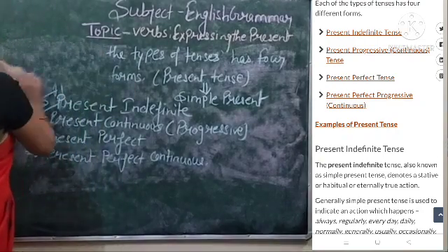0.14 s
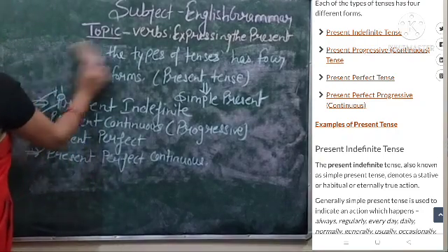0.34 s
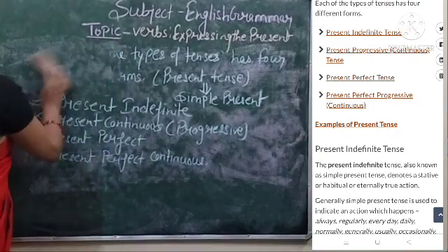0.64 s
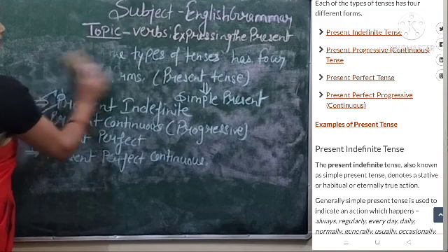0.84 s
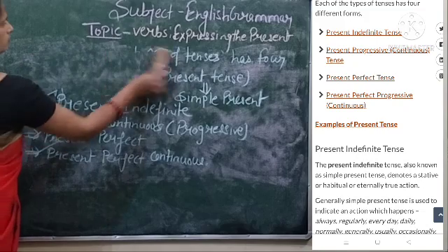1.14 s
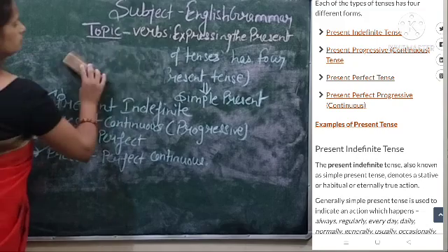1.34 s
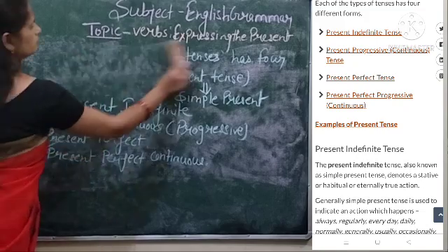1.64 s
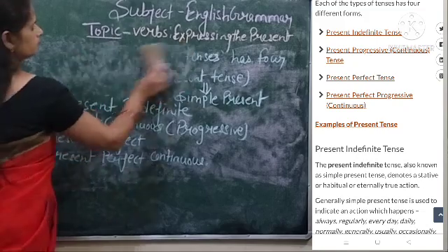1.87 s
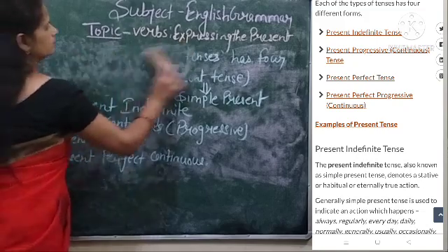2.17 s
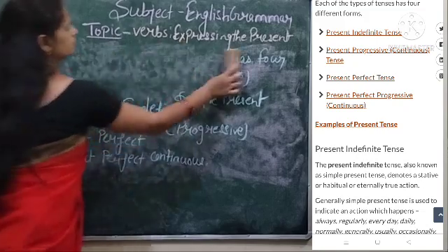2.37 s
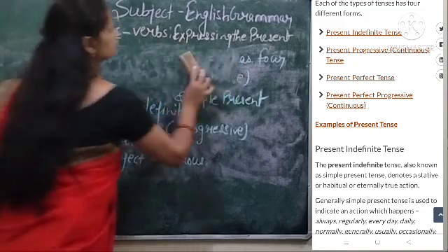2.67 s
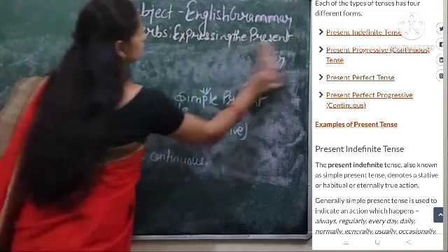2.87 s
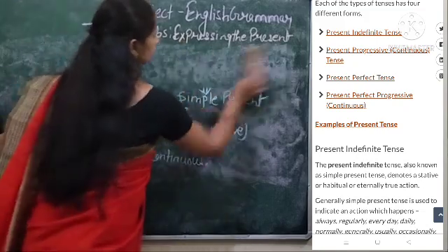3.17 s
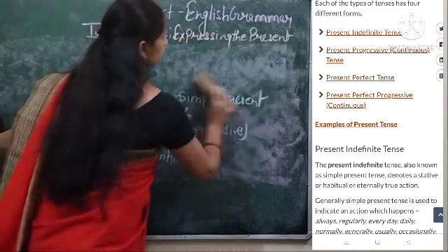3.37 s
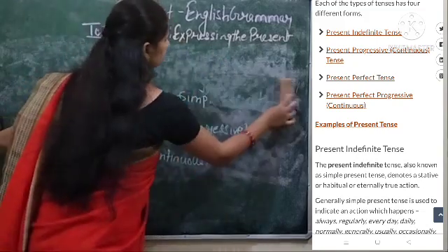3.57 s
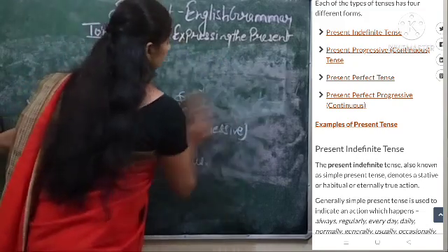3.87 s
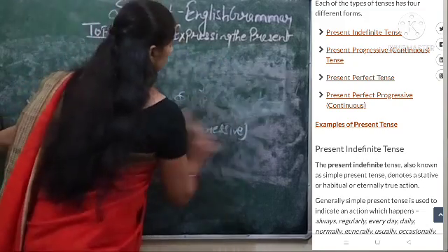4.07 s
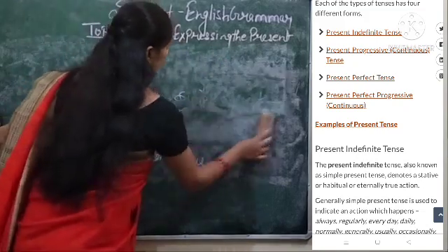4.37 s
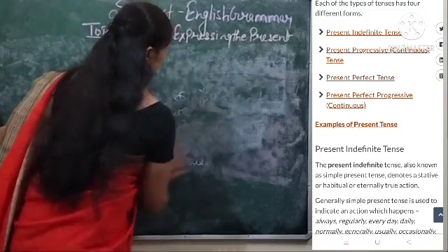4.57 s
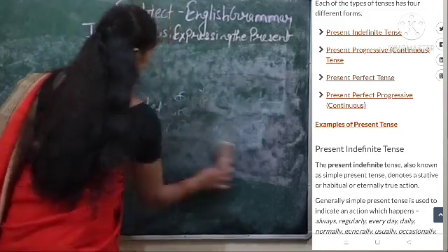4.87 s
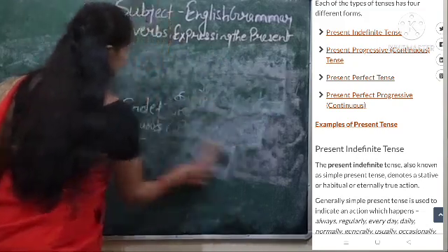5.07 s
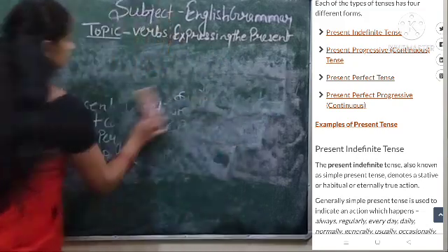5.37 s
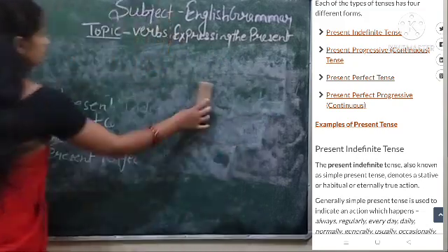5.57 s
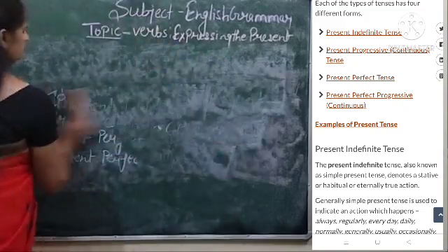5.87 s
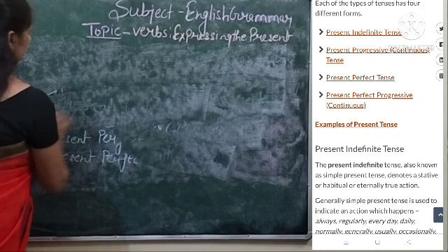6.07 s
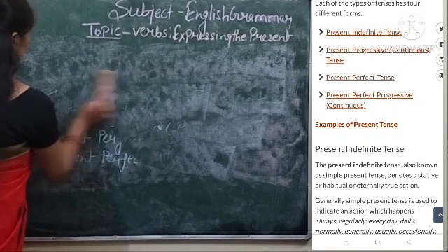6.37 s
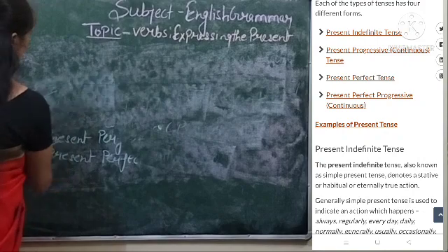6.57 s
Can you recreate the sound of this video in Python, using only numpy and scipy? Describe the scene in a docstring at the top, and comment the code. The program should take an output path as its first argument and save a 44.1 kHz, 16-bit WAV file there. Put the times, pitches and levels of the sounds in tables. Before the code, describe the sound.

A duster wipes a blackboard in hissing strokes over a rushing fan that buffets the microphone, with two bangle clinks and a distant bird whistle.

```python
"""From the start a felt duster sweeps to and fro over a chalky blackboard, hissing by friction, while a fan
rushes and its draught buffets one small microphone in low lumps. At 0.3 s glass bangles collide and ring.
From 1.6 s a far bird whistles once through the classroom. Near 5 s the bangles clink again,
and duster and fan go on to the end."""
import sys
import numpy as np
from scipy import signal
from scipy.fft import rfft, irfft, next_fast_len
from scipy.io import wavfile
from scipy.ndimage import map_coordinates

SR = 44100
rng = np.random.default_rng(int(sys.argv[2]) if len(sys.argv) > 2 else 0)


def int16_out(signal):
    """Quantize to a 16-bit WAV file."""
    q = np.round(np.clip(np.atleast_2d(signal).T, -1, 1) * 32767)
    wavfile.write(sys.argv[1], SR, q.astype(np.int16))


N = 296793

# The fan's rush. Each row: frequency in Hz, relative spectral density in dB.
FAN_SPECTRUM = [(25, -19), (70, -33), (100, -6.5), (200, -9), (450, -7.5), (900, -4), (1500, -4.5),
                (2300, -14.5), (4000, -20), (5000, -44), (5800, -32), (8000, -46.5), (16000, -50)]
# Room resonances in the rush. Each row: centre in Hz, bandwidth in Hz, gain in dB.
ROOM_MODES = [(104, 15, 2), (316.4, 47, 6), (562, 97, 0.5), (785, 91, -2), (1058, 87, -3.5)]
# Loudness of the fan. Each row: time in seconds, level in dB.
FAN_LEVEL = [(0, -42), (3.5, -41), (6.73, -41.5)]
# Gusts of the draught. Each row: time in seconds, level in dB.
GUSTS = [(0, -44), (.27, -46.5), (.36, -34), (.56, -41), (.65, -48), (.75, -43), (1.05, -37.5), (1.18, -44),
         (1.35, -32), (1.5, -37), (1.62, -24), (1.71, -37.5), (1.82, -38), (1.92, -48), (2.43, -60.5),
         (2.7, -26), (2.88, -41), (3.12, -41.5), (3.24, -30.5), (3.42, -44), (3.95, -50.5), (4.3, -44.5),
         (4.45, -56), (4.72, -55), (4.86, -37.5), (4.97, -55), (5.15, -46), (5.42, -50), (5.49, -36),
         (5.6, -41), (5.76, -33.5), (5.88, -46.5), (6.05, -41), (6.6, -42), (6.73, -47)]
# Buffeting noise. Each row: frequency in Hz, relative spectral density in dB.
BUFFET_SPECTRUM = [(25, -23), (50, -11.5), (90, 3), (140, -2.5), (220, -10.5), (330, -13.5), (500, -25),
                   (900, -72)]
# Eddies bursting on the microphone. Each row: centre in seconds, level in dB, pitch in Hz, length in ms.
EDDIES = [(0.055, -28, 102, 18), (0.323, -29, 150, 10), (0.389, -27.5, 132, 43), (0.439, -24, 128, 10),
          (0.478, -22.5, 133, 11), (0.533, -29, 111, 46), (0.584, -23.5, 149, 13.6),
          (0.617, -27.5, 107, 19), (0.884, -28, 139, 8.3), (0.952, -26, 133, 6.8), (1.002, -25, 183, 6.7),
          (1.026, -22, 140, 22), (1.065, -25, 133, 12), (1.134, -29.5, 110, 14), (1.269, -27, 111, 18),
          (1.312, -20, 148, 11), (1.329, -20.5, 175, 12), (1.36, -17, 176, 4.5), (1.377, -14, 132, 7.3),
          (1.406, -26, 134, 7.3), (1.436, -16, 119, 19), (1.463, -18.5, 135, 4.9), (1.548, -13.5, 182, 4.1),
          (1.593, -25, 126, 19), (1.632, -13, 148, 13), (1.703, -31.5, 169, 29), (1.748, -27.5, 152, 22),
          (1.782, -25.5, 166, 8.8), (1.89, -28, 123, 15), (2.543, -30.5, 112, 21), (2.596, -24.5, 125, 9),
          (2.632, -26, 161, 24), (2.676, -18, 170, 6.8), (2.7, -17, 212, 7.6), (2.737, -14, 176, 4.8),
          (2.808, -22, 128, 9), (2.98, -27, 140, 10), (3.021, -19, 122, 9.2), (3.096, -23.5, 112, 20),
          (3.18, -16, 154, 7.7), (3.225, -19, 110.6, 44), (3.246, -11, 137, 4.4), (3.27, -18, 149, 7.2),
          (3.316, -30, 151, 9), (3.332, -16.5, 150, 6.2), (3.362, -21.5, 154, 17), (3.379, -27, 144, 14),
          (3.531, -21.5, 131, 5.8), (3.79, -37, 150, 25), (4.1, -37, 85, 18), (4.22, -36, 85, 22),
          (4.853, -21.5, 129, 9.3), (4.898, -22.5, 181, 5.2), (4.919, -27, 110, 18),
          (5.494, -19.5, 139, 10), (5.673, -21, 116, 10), (5.7, -24, 103, 16), (5.726, -22, 139, 5.1),
          (5.786, -21.5, 148, 5.3), (6.204, -25.5, 139, 6.8), (6.379, -30, 147, 20),
          (6.412, -23, 108.6, 28), (6.438, -24, 111, 13)]
# The bird's call. Each row: time in seconds, pitch in Hz, level in dB.
BIRD_CALL = [(1.56, 4070, -70), (1.6, 4120, -57), (1.67, 4215, -49), (1.72, 4230, -42), (1.81, 4270, -44),
             (1.845, 4300, -48), (1.87, 4230, -58), (1.905, 4245, -48), (1.94, 4270, -57),
             (2.03, 4210, -56), (2.16, 4200, -74)]
# Touches of the bangles. Each row: start in seconds, level in dB, gain of the upper modes in dB.
TOUCHES = [(.333, -42.5, -2), (.345, -45, -6), (.363, -54, -6), (4.964, -58, 16), (4.969, -43, 9),
           (4.976, -48, 10), (4.986, -50, 2)]
# Modes of the glass. Each row: frequency in Hz, relative level in dB, time to fall 60 dB in seconds.
GLASS_MODES = [(8900, -7, 0.018), (9350, 4, 0.021), (9770, 1, .02), (10000, 0, .02), (13400, -4, .02),
               (13850, 0, .025), (14300, -3, .02), (15250, -12, .015)]
# Sweeps of the duster. Each row: opening turn in seconds, fastest moment in seconds,
# hiss at the turn in dB, hiss at full speed in dB, rasp at full speed in dB.
SWEEPS = [(-.1, .04, -58, -45.5, -50.5), (0.248, 0.364, -62.5, -48.5, -51.5), (0.5, 0.695, -57, -47.5, -51),
          (.86, 1.03, -60, -49, -53), (1.14, 1.358, -58, -46.5, -51), (1.54, 1.69, -60.5, -50, -56),
          (1.808, 2.052, -59, -44, -48), (2.228, 2.35, -60, -51, -54.5), (2.43, 2.59, -57, -43, -47.5),
          (2.83, 3.04, -58, -47, -49.5), (3.112, 3.24, -55, -43, -47), (3.43, 3.643, -56.5, -44, -47.5),
          (3.762, 3.9, -56.5, -43, -46), (4.102, 4.3, -57, -45.5, -47), (4.45, 4.6, -58, -42.5, -46.5),
          (4.752, 4.94, -57.5, -46, -49.5), (5.07, 5.24, -51, -44.5, -49.5),
          (5.384, 5.682, -56, -44.5, -47.5), (5.82, 5.946, -56.5, -43, -48.5),
          (6.082, 6.257, -56.5, -43, -46.5), (6.38, 6.52, -54.5, -41, -48), (6.73, 6.9, -59.5, -45, -46)]
# The felt's hiss. Each row: frequency in Hz, relative spectral density in dB.
HISS_SPECTRUM = [(3000, -66), (5000, -1.5), (7000, -3.5), (10000, -0.5), (13000, 4.5), (16000, -1)]
# The board's rasp. Each row: frequency in Hz, relative spectral density in dB.
RASP_SPECTRUM = [(900, -14), (1500, -7), (2300, -3.5), (3200, 0), (4400, 0.5), (5200, -2.5), (5800, -9.5),
                 (9000, -12.5)]
# The wooden back rings more in some places. Each row: time in seconds, level against the rasp in dB.
BACK_RING = [(0, -10), (1.2, -13), (2.7, -7.5), (3.6, -10.5), (4.3, -8), (5.2, -13), (5.8, -7.5),
             (6.73, -5.5)]
# Reverberation of the classroom. Each row: frequency in Hz, time to fall 60 dB in seconds.
ROOM_DECAY = [(300, 0.39), (4000, 0.34), (12000, 0.13)]
# Resonances of the microphone's port. Each row: frequency in Hz, gain in dB.
PORT_RESPONSE = [(5000, 1), (6400, 1), (7400, 6.5), (8200, 12), (9300, 4), (11800, -7), (13500, -8),
                 (15500, 2.5)]


def amp(db):
    """Decibels as an amplitude ratio."""
    return 10 ** (np.asarray(db) / 20)


def unit_rms(x):
    """Normalisation to unit power."""
    return x / np.sqrt(np.mean(x ** 2) + 1e-20)


def at_frequency(points, hz):
    """Interpolation of (Hz, value) points on a logarithmic axis."""
    freqs, values = np.transpose(points)
    return np.interp(np.log(hz + 1), np.log(freqs + 1), values)


def curves(rows):
    """Linear interpolation in time: one curve for each column after the first."""
    times, *columns = np.transpose(rows)
    return [np.interp(np.arange(N) / SR, times, column) for column in columns]


def wobble(rate):
    """Smooth random modulation, with `rate` knots a second."""
    return map_coordinates(rng.standard_normal(int(N * rate / SR) + 4), [np.arange(N) * rate / SR])


def filtered(x, response):
    """Filtering as multiplication of the spectrum by a response."""
    size = next_fast_len(N + SR // 2)
    return irfft(rfft(x, size) * response(np.fft.rfftfreq(size, 1 / SR)), size)[:N]


def coloured(x, spectrum):
    """Spectral shaping by (Hz, dB) points, at unit power."""
    return unit_rms(filtered(x, lambda hz: amp(at_frequency(spectrum, hz))))


def resonance(x, centre_hz, width_hz):
    """A resonance passes a bell-shaped band about its centre."""
    return filtered(x, lambda hz: 1 / (1 + (2 * (hz - centre_hz) / width_hz) ** 2))


def room(x):
    """Reverberation: each frequency decays at its own rate; the response changes as the hand moves."""
    out, hop = np.zeros(N + SR), SR // 5
    fade = np.hanning(2 * hop)
    x = np.pad(x, (hop + 300, 2 * hop))  # reflections arrive 300 samples late
    for start in range(0, N, hop):
        hz, t, noise = signal.stft(rng.standard_normal(SR // 2), SR, nperseg=256)
        decay = amp(-60 * t / at_frequency(ROOM_DECAY, hz)[:, None])
        tail = signal.istft(noise * decay, SR, nperseg=256)[1]
        echoes = signal.fftconvolve(x[start:][:2 * hop] * fade, tail / np.linalg.norm(tail))
        out[start:][:len(echoes)] += echoes
    return out[hop:][:N]


def fan():
    """Broadband air noise excites room resonances, which slowly swell and fade."""
    rush = coloured(rng.standard_normal(N), FAN_SPECTRUM)
    swells = sum(amp(db + 2.5 * wobble(2.93)) * resonance(rush, hz, width)
                 for hz, width, db in ROOM_MODES)
    return amp(curves(FAN_LEVEL)[0]) * unit_rms(rush + swells)


def draught(low_cut_hz=65):
    """Turbulence at the microphone: gusts give low noise, strong eddies brief lopsided pressure swings."""
    buffeting = amp(2.5 * wobble(35)) * coloured(rng.standard_normal(N), BUFFET_SPECTRUM)
    out = np.pad(amp(curves(GUSTS)[0]) * unit_rms(buffeting), SR)
    t = np.arange(-SR // 20, SR // 20) / SR
    for centre, db, hz, ms in EDDIES:
        offset, glide, skew = rng.uniform(-1.04, 1, 3)
        swell = amp(-24 * (t * 1000 / ms) ** 2)  # 6 dB down at both ends of its length
        phase = 2 * np.pi * hz * t * (1 + 14 * glide * t) + np.pi * offset
        swing = np.cos(phase + 0.3 * np.sin(phase + np.pi * skew)) + .15 * skew  # steep flank, net push
        out[SR + round(centre * SR) - SR // 20:][:len(t)] += amp(db) * swell * swing
    return filtered(out[SR:-SR], lambda hz: 1 / np.sqrt(1 + (low_cut_hz / (hz + 1)) ** 5))


def bird():
    """Frequency modulation: a whistle rises and levels off, with a faint octave and a rough lower note."""
    hz, db = curves(BIRD_CALL)
    phase = 2 * np.pi * np.cumsum(hz + 40 * wobble(110)) / SR
    lower_phase = 2 * np.pi * np.cumsum(np.minimum(hz, 4135) + 50 * wobble(110)) / SR
    whistle = np.sin(phase) + amp(-21.5) * np.sin(2 * phase)
    lower_note = amp(-11 + 3.4 * wobble(40.7)) * np.sin(lower_phase)
    sounding = db > max(BIRD_CALL[0][2], BIRD_CALL[-1][2])
    return sounding * amp(db + 3 * wobble(45)) * (whistle + lower_note)


def bangles(upper_hz=12000, attack_s=0.00058):
    """Free vibration: each touch of the glass rings excites their damped modes at new strengths."""
    out, t = np.zeros(N + SR), np.arange(SR // 5) / SR
    attack = 1 - np.exp(-t / attack_s)
    for start, touch_db, upper_db in TOUCHES:
        for hz, mode_db, t60 in GLASS_MODES:
            db = touch_db + mode_db + upper_db * (hz > upper_hz) + rng.normal(0, 2.5)
            envelope = attack * amp(db - 60 * t / t60)
            out[round(start * SR):][:len(t)] += envelope * np.sin(2 * np.pi * hz * t)
    return out[:N]


def sweep_levels(rasp_share=0.76):
    """Friction noise follows sliding speed: hiss and rasp, in dB, dip as the hand slows into each turn."""
    turn, fastest, turn_db, hiss_db, rasp_db = np.transpose(SWEEPS)
    t, marks = np.arange(N) / SR, np.ravel([turn, fastest], 'F')
    phase = np.pi / 2 * np.interp(t, marks, np.arange(len(marks)))
    speed = np.abs(np.sin(phase)) ** 0.94  # a power under 1 lingers near full speed
    slow_db = turn_db[np.searchsorted(fastest, t)]  # at the nearest turn
    full_db = hiss_db[np.searchsorted(turn, t) - 1]  # of the running sweep
    dip_db = (1 - speed) * (slow_db - np.interp(t, fastest, hiss_db))
    return slow_db + speed * (full_db - slow_db), np.interp(t, fastest, rasp_db) + rasp_share * dip_db


def slips(spread_db):
    """Countless slips of unequal strength add up to grainy noise."""
    return rng.standard_normal(N) * amp(spread_db * np.minimum(rng.exponential(size=N), 5))


def duster():
    """Sliding friction: chalk grains slip, so the felt hisses, the board rasps and its back rings."""
    hiss_db, rasp_db = sweep_levels()
    grip_db = .5 * wobble(14)  # the hand's pressure trembles
    felt = coloured(slips(1.8), HISS_SPECTRUM)
    treble = filtered(felt, lambda hz: 1 / (1 + (9800 / (hz + 1)) ** 8))
    felt += (amp(0.16 * (hiss_db + 46.5)) - 1) * treble  # a slow duster loses its highest treble first
    hiss = amp(hiss_db + grip_db + 0.4 * wobble(150)) * felt
    ring = unit_rms(resonance(slips(2.5), centre_hz=4400, width_hz=700))
    board = coloured(slips(2.2), RASP_SPECTRUM) + amp(curves(BACK_RING)[0]) * ring
    return hiss + amp(rasp_db + grip_db + 0.38 * wobble(60)) * board


def scene():
    """Superposition: direct sound and reverberation add at one microphone, which feeds both channels."""
    rub, clinks, call = duster(), bangles(), bird()
    reverberation = room(amp(-17.5) * rub + clinks + amp(-1.5) * call)
    return np.tile(rub + clinks + call + reverberation + fan() + draught(), (2, 1))


def record(dry):
    """Resonance in the microphone's port colours the treble; nothing passes above the band limit."""
    limit_hz = 15520
    return np.array([filtered(channel, lambda hz: amp(at_frequency(PORT_RESPONSE, hz)) * (hz < limit_hz))
                     for channel in dry])


dry = scene()
out = record(dry)
int16_out(out)
```